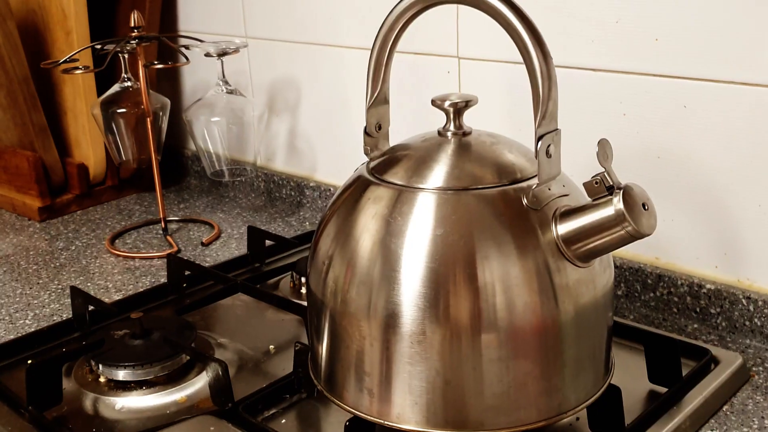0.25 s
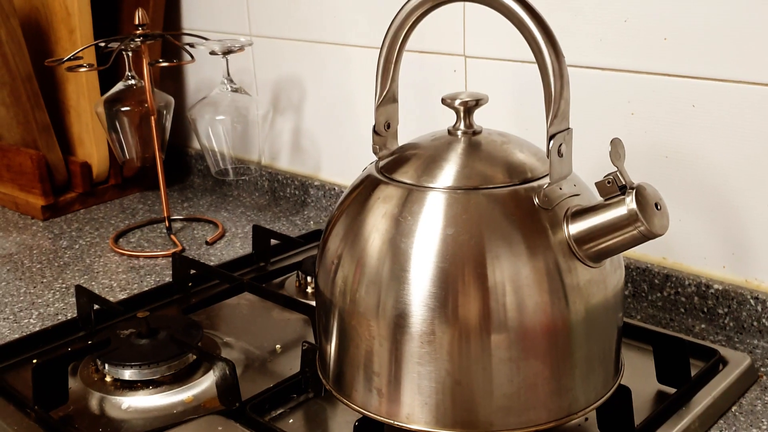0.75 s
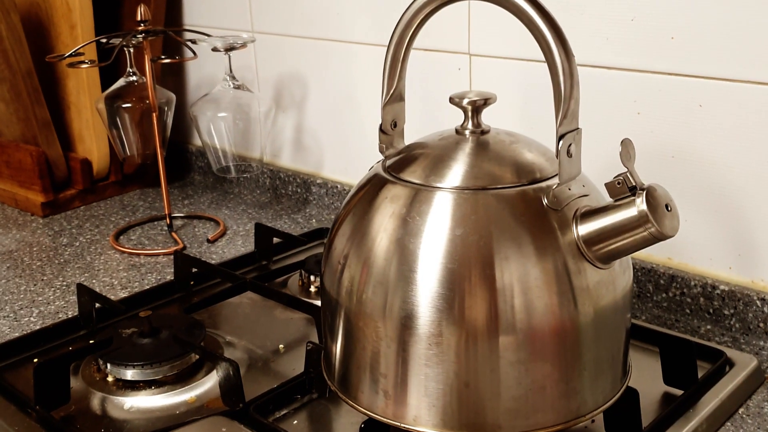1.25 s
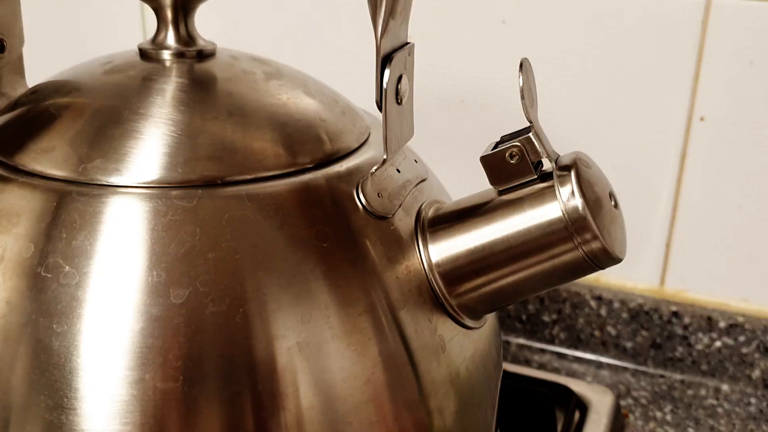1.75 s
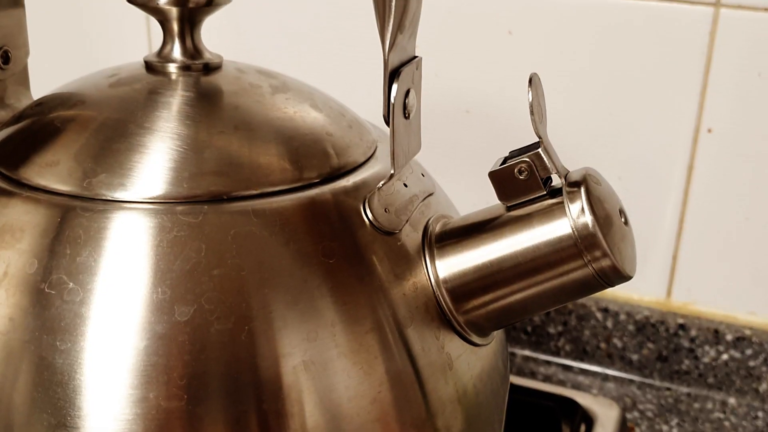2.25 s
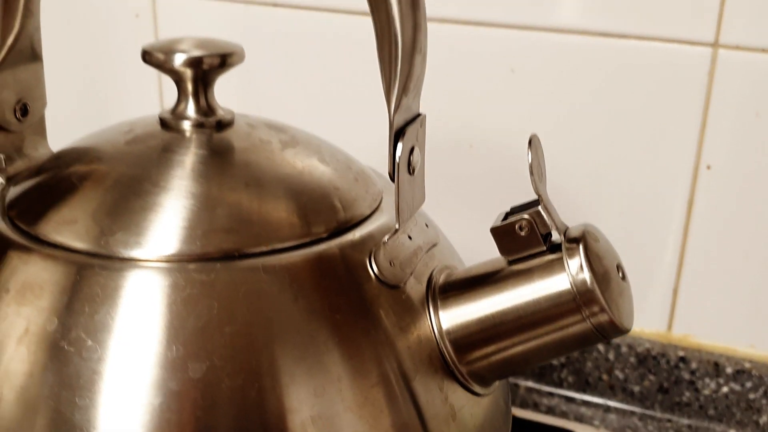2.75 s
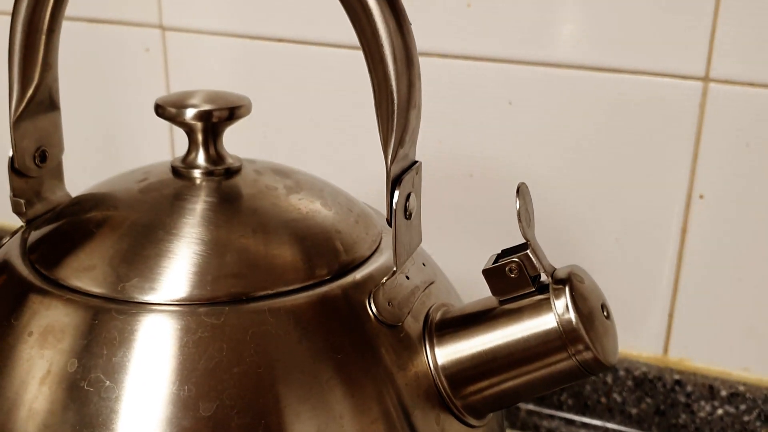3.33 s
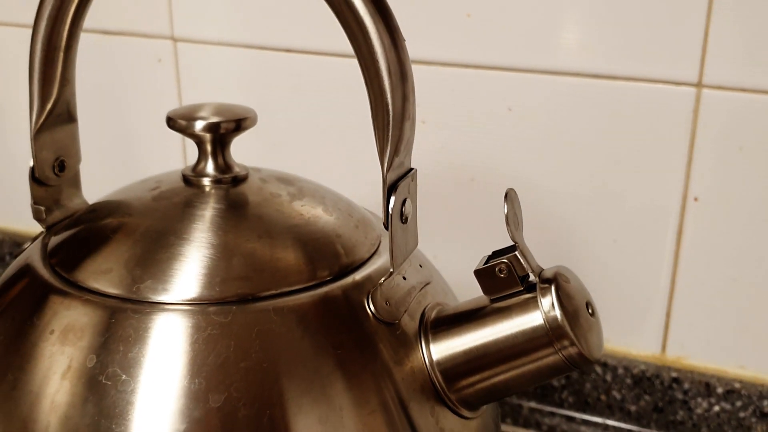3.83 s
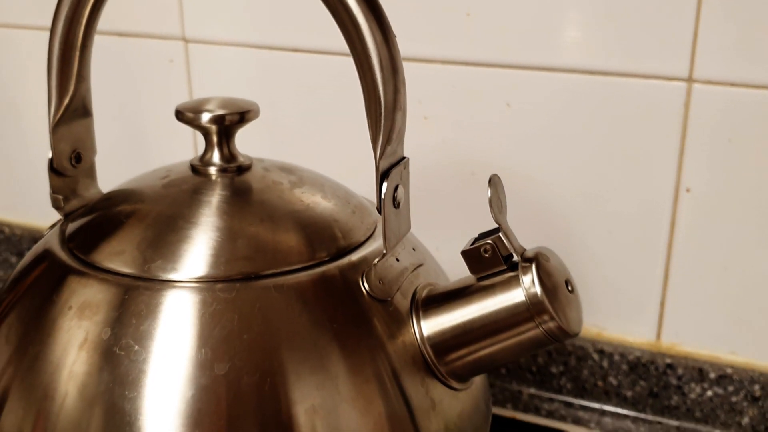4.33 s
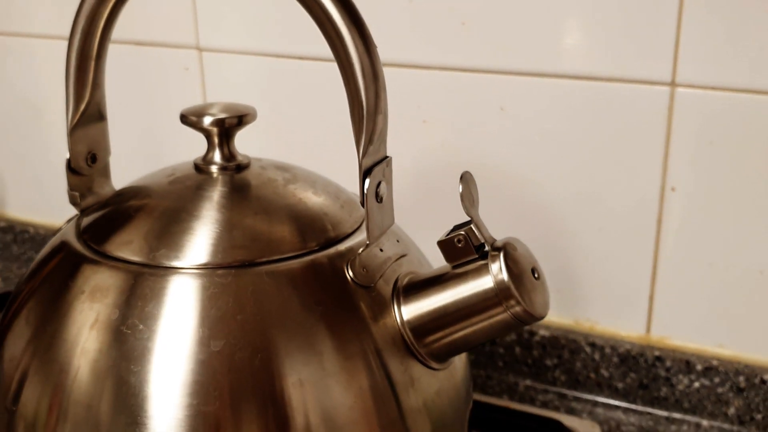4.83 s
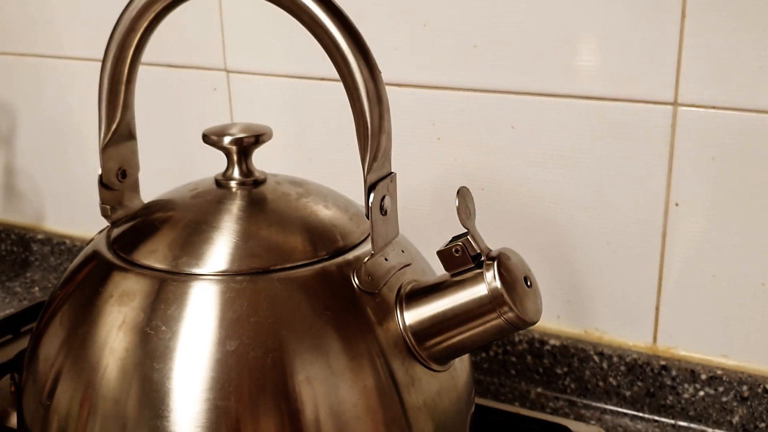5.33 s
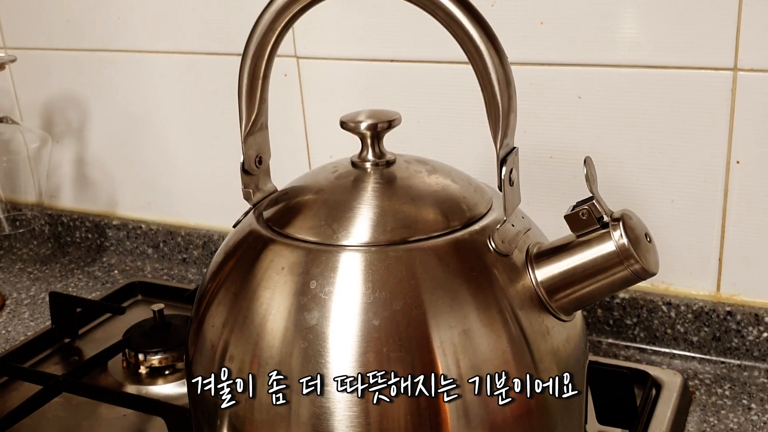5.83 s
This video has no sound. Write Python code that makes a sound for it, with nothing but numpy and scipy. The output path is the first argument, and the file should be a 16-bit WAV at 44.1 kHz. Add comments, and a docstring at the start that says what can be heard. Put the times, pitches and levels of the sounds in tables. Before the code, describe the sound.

In a small tiled kitchen, water seethes for an instant, then after a tiny gap a kettle whistles from a step away in hissing steam. It flips briefly to a higher, purer note and returns. A hard cut brings the microphone close: a louder, brighter whistle wavers and creeps upward over a faint flame rumble. It cuts suddenly to a very quiet low whistle.

```python
"""Whistling kettle

A steel kettle whistles on a gas hob in a tiled kitchen, in four passages: seething, far, near, weak.
Shaped noise makes the seething water. Then steam sings in the spout cap, as pitch-driven sine partials in
a bed of hiss, and briefly jumps to a higher mode. From close by the whistle is louder and creeps up,
wavering with the pressure; last comes a weak, low whistle. Low noise rumbles as the flame under all three
whistles."""
import sys
import numpy as np
from scipy import signal
from scipy.fft import rfft, irfft
from scipy.io import wavfile
from scipy.ndimage import uniform_filter1d, map_coordinates

SR = 44100
rng = np.random.default_rng(int(sys.argv[2]) if len(sys.argv) > 2 else 0)


def master(y):
    """Save y as 16-bit WAV."""
    cut = np.clip(np.atleast_2d(y).T, -1, 1)
    pcm = np.round(cut * 32767)  # scale
    wavfile.write(sys.argv[1], SR, pcm.astype(np.int16))


N = 267995
TIME = np.arange(N) / SR
BINS = np.maximum(np.arange(N // 2 + 1) * SR / N, 1)  # Hz

# passages and the jump to the higher mode: (start s, end s)
SEETHE_SPAN, FAR_SPAN = (0, .137), (.197, 1.806)
NEAR_SPAN, WEAK_SPAN = (1.855, 5.767), (5.767, 6.1)
JUMP = (0.656, 1.008)
KITCHEN_T60_S = 0.35


def whistle(pitch_hz, partials, lower_db, upper_db, waver, jitter, wet_db, lag_s=0):
    """The jet oscillates in the cap: pressure swings bend its pitch and turbulence roughens it."""
    hz = pitch_hz * (1 + waver * drift(36.0) + jitter * drift(169.4))
    # the right ear hears it later by the lag
    phase = 2 * np.pi * (np.cumsum(hz) / SR - lag_s * hz * [[0], [1]])
    # an unsteady jet flutters in strength too
    flutter = from_db(190 * jitter * drift(70))
    out = 0
    for multiple, db, balance_db in partials:
        # higher partials beam forward and excite the room less
        tone = kitchen(flutter * np.sin(round(multiple) * phase), wet_db - 2 * np.log2(multiple))
        # the steam flow alone sets the slow level; quick fades remain
        tone /= np.sqrt(uniform_filter1d(tone ** 2, size=2000, axis=1) + 1e-9)
        level_db = db + (lower_db if multiple < 1.5 else upper_db)
        out = out + tone * panned(balance_db) * from_db(level_db)
    return out


# whistle pitch, which follows the steam pressure: (t/s, f/Hz)
NEAR_PITCH = [(1.86, 2225), (1.94, 2265), (1.99, 2237), (2.08, 2253), (2.23, 2260), (2.29, 2315),
              (2.34, 2272), (2.41, 2317), (2.5, 2286), (2.54, 2258), (2.62, 2248), (2.67, 2265),
              (2.81, 2262), (2.91, 2312), (2.99, 2280), (3.03, 2250), (3.21, 2218), (3.5, 2254),
              (3.55, 2281), (3.64, 2266), (3.72, 2243), (3.85, 2234), (3.9, 2273), (3.97, 2264),
              (4.01, 2217), (4.12, 2279), (4.21, 2213), (4.29, 2257), (4.41, 2247), (4.45, 2223),
              (4.48, 2257), (4.55, 2290), (4.575, 2274), (4.62, 2256), (4.65, 2302), (4.72, 2324),
              (4.762, 2248), (4.797, 2355), (4.828, 2260), (4.85, 2304), (4.9, 2318), (4.925, 2382),
              (4.975, 2298), (5.01, 2290), (5.028, 2350), (5.072, 2343), (5.097, 2274), (5.17, 2293),
              (5.245, 2333), (5.28, 2310), (5.35, 2314), (5.39, 2390), (5.42, 2372), (5.44, 2318),
              (5.48, 2327), (5.515, 2364), (5.565, 2340), (5.615, 2387), (5.66, 2371), (5.76, 2340)]
# partials: (multiple of the pitch, level/dB against its driving curve, left-right/dB)
NEAR_PARTIALS = [(1, 1, -4), (2, 0, -8.5), (3, -10.5, -2), (4, -27, -23), (5, -31.5, -28)]
# steam hiss, peaking at the spout's resonances: (f/Hz, level/dB per Hz)
NEAR_HISS = [(500, -37), (1350, -13), (1650, -18.5), (1950, -4.5), (2400, -1), (2950, -3), (3400, 1),
             (4200, -3), (5200, 1.5), (7600, -3), (9600, -12.5), (13000, -11), (15500, -24)]
# narrow rings and one null of the cap: (f/Hz, width/Hz, level/dB over the hiss)
CAP_RINGS = [(2740, 167, -29), (3870, 52, 6), (4110, 140, 8), (4890, 97, 4.5), (7350, 71, 6)]
# spurts of steam flick the pitch upward: (t/s, height/percent)
FLICKS = [(2.286, 1.22), (2.862, 1.67), (4.651, 2.26), (4.958, 2.5), (5.255, 3.2), (5.732, 2.56)]
REST_HZ, FLICK_HALF_S = 2238.4, 0.00651
# turbulence bends the pitch more as pressure grows: (share of the pitch, share per percent)
CALM_JITTER, JITTER_PER_PERCENT = .003, 0.00056
# a rasp just under the fundamental fades as the tone firms up
RASP_DB, RASP_FADE_DB_PER_S = -13, 2


def near_kettle():
    """At full boil, mostly direct sound in a bright steam jet whose resonances ride with the pitch."""
    pitch_hz, = in_time(NEAR_PITCH)
    pressure = 100 * (pitch_hz / REST_HZ - 1)  # percent of pitch above rest
    first_db, octave_db, hiss_db, treble_db = near_blow(pressure)
    flick_percent = swells([(s, FLICK_HALF_S, percent) for s, percent in FLICKS])
    flicked_hz = pitch_hz * (1 + flick_percent / 100)
    jitter = CALM_JITTER + JITTER_PER_PERCENT * np.maximum(pressure, 0)
    tone = whistle(flicked_hz, NEAR_PARTIALS, first_db, octave_db,
                   waver=0.0043, jitter=jitter, wet_db=-8.0, lag_s=2.8e-5)

    sputter = from_db(2.8 * np.tanh(drift(14)))
    fifth = from_db(-14.5) * sputter * panned(-19.0) * breathy_mode(NEAR_PITCH, 3 / 2, width_hz=21)
    rasp_db = RASP_DB - RASP_FADE_DB_PER_S * (TIME - NEAR_SPAN[0])
    rasp = from_db(rasp_db) * breathy_mode(NEAR_PITCH, 0.9, width_hz=94)

    jet = steam(NEAR_HISS, CAP_RINGS, direct_share=0.83, tuning=pitch_hz / REST_HZ)
    treble = irfft(rfft(jet) / (1 + (9000 / BINS) ** 6), N)
    jet = jet + treble * (from_db(treble_db) - 1)
    return tone + from_db(hiss_db + 6.5 + 1.55 * drift(49)) * (jet + fifth + rasp)


# the close steam jet: (t/s, level/dB before the jet's 6.5 dB lift, treble level/dB)
NEAR_STEAM = [(1.9, -55.5, -6.5), (2.3, -53.5, -2.5), (3.2, -54, -2.3), (3.6, -53.5, 0.5), (4.1, -56, -0.5),
              (4.7, -57, 0.5), (5.7, -58, -1)]
# the jet keeps losing its lock and the tone stutters: (middle t/s, half length/s, loss/dB before its swing)
STUTTERS = [(2.245, 0.02, 6.5), (2.325, 0.023, 4.5), (2.495, 0.029, 7.5), (2.7, 0.037, 12),
            (2.87, 0.041, 7), (2.955, 0.025, 10.5)]
# the loss swings by a share of itself; the octave feels a share of it
STUTTER_SWING, STUTTERS_PER_S, OCTAVE_FEELS = 0.73, 58, 0.21
# at the start of the passage; the fundamental slowly gains on the octave
NEAR_FIRST_DB, NEAR_OCTAVE_DB, FIRST_DB_PER_S = -37.5, -39, 0.58
# pressure feeds and brightens the hiss and starves the octave
HISS_DB_PER_PERCENT, TREBLE_DB_PER_PERCENT, OCTAVE_DB_PER_PERCENT = 0.48, 1.09, -0.4
# a deeper pressure sag makes the flow falter: (percent of pitch, octave loss in dB per further percent)
SAG_PERCENT, SAG_OCTAVE_DB = 0.43, 6.5


def near_blow(pressure):
    """Pressure, its sags and the losses of lock set the fundamental, octave, hiss and treble levels."""
    steam_db, treble_db = in_time(NEAR_STEAM)
    sag = np.maximum(uniform_filter1d(pressure, size=17000) - pressure - SAG_PERCENT, 0)
    stutter_db = swells(STUTTERS) * (1 + STUTTER_SWING * drift(STUTTERS_PER_S))
    first_db = NEAR_FIRST_DB + FIRST_DB_PER_S * (TIME - NEAR_SPAN[0]) - stutter_db
    octave_db = NEAR_OCTAVE_DB + OCTAVE_DB_PER_PERCENT * pressure
    octave_db = octave_db - OCTAVE_FEELS * stutter_db - SAG_OCTAVE_DB * sag
    hiss_db = steam_db + HISS_DB_PER_PERCENT * pressure
    return first_db, octave_db, hiss_db, treble_db + TREBLE_DB_PER_PERCENT * pressure


# whistle pitch, one list before the jump and one after: (t/s, f/Hz)
FAR_PITCH = [
    [(0.25, 2105), (0.37, 2074), (0.42, 2090), (0.562, 2095), (0.65, 2043)],
    [(1.02, 2128), (1.09, 2205), (1.23, 2170), (1.31, 2135), (1.46, 2176), (1.5, 2144), (1.6, 2193),
     (1.66, 2115), (1.79, 2132)],
]
# pitch of the higher mode: (t/s, f/Hz)
JUMP_PITCH = [(.657, 3400), (.68, 3256), (.72, 3309), (.85, 3395), (.95, 3508), (.985, 3380), (1.01, 3630)]
# level driving the higher mode: (t/s, level/dB)
JUMP_LEVEL = [(0.665, -46), (0.724, -44.5), (0.736, -42.5), (0.812, -35.5), (0.828, -40), (0.918, -38),
              (0.948, -48), (0.972, -36.5), (1.0, -39.5)]
# partials of either mode: (multiple of the pitch, level/dB against its driving curve, left-right/dB)
FAR_PARTIALS = [(1, -2, -4.5), (2, -0.5, -9.5), (3, -27.5, -45), (4, -31.5, 18)]
JUMP_PARTIALS = [(1, -0.5, -6.5), (2, -27.5, 2), (3, -43, -3)]
# steam hiss, peaking at the spout's resonances: (f/Hz, level/dB per Hz)
FAR_HISS = [(500, -20), (1450, -8.5), (1980, 8), (2400, 3.5), (2750, -1), (3200, 1.5), (3700, 7.5),
            (4700, 5), (5800, -0.5), (7000, -4.5), (8200, -9.5), (11000, -10.5), (15500, -17)]


def far_kettle():
    """From a step away; for a moment the jet locks on the cap's higher mode and the main tone gives way."""
    pitch = np.vstack(FAR_PITCH)
    first_db, octave_db, hiss_db, jitter = far_blow()
    jump_db, = in_time(JUMP_LEVEL)
    jumped = during(JUMP, edge_s=0.0054)
    main = whistle(in_time(pitch)[0], FAR_PARTIALS, first_db, octave_db,
                   waver=0.00304, jitter=jitter, wet_db=-9.5, lag_s=7e-5)
    high = whistle(in_time(JUMP_PITCH)[0], JUMP_PARTIALS, jump_db, jump_db,
                   waver=0.0034, jitter=0.0034, wet_db=3)
    # after each switch the old tone only dies away in the room
    ring_out = from_db(-jumped * (12 + 60 * (TIME - JUMP[0]) / KITCHEN_T60_S))
    high_decay = np.exp(-np.maximum(TIME - JUMP[1], 0) / 0.037)
    high_gate = during((JUMP[0], FAR_SPAN[1]), edge_s=.004) * high_decay

    fifth = from_db(-4.5) * breathy_mode(pitch, 1.51, width_hz=53)
    # while unlocked, the lower mode is rung by turbulence alone
    rasp = from_db(-6.5 + 10.2 * jumped) * breathy_mode(pitch, 0.95, width_hz=120)
    hiss_gain = from_db(hiss_db + hush() + 10.0 + 1.65 * drift(30))
    hiss = hiss_gain * (steam(FAR_HISS, [], direct_share=0.35) + fifth + rasp)
    return main * ring_out + high * high_gate + hiss


# before and after the jump: (fundamental level/dB, octave level/dB, hiss level/dB before its 10 dB lift,
# jitter as a share of the pitch)
FAR_BLOW = [(-39, -41, -61.5, 0.0036), (-41.5, -39, -60, 0.0052)]
# the fundamental is slow to return, and fades at the end: (middle t/s, half length/s, loss/dB)
FAR_FADES = [(1.01, 0.033, 6), (1.75, 0.041, 14)]
FAR_SWELL_DB, FAR_SWELLS_PER_S = 2, 28


def far_blow():
    """Each side of the jump holds its levels and jitter; the fundamental swells and sags at random."""
    after_jump = (TIME > np.mean(JUMP)).astype(int)
    first_db, octave_db, hiss_db, jitter = np.array(FAR_BLOW)[after_jump].T
    first_db = first_db + FAR_SWELL_DB * drift(FAR_SWELLS_PER_S) - swells(FAR_FADES)
    return first_db, octave_db, hiss_db, jitter


HUSH_DB, HUSH_FALL_S, HUSH_RECOVER_S = 18, 0.088, 0.27


def hush():
    """While the higher mode takes the flow, the hiss sinks quickly and then creeps back (dB)."""
    since = TIME - JUMP[0]
    recovery = np.exp(-np.maximum(since - HUSH_FALL_S, 0) / HUSH_RECOVER_S)
    depth = np.clip(since / HUSH_FALL_S, 0, 1) * recovery
    return -HUSH_DB * depth * during(JUMP, edge_s=0.012)


# low whistle pitch: (t/s, f/Hz)
WEAK_PITCH = [(5.77, 980), (5.785, 997.5), (5.85, 1004), (5.93, 983), (5.964, 925), (5.98, 1015),
              (6.07, 1030)]
# levels driving the partials: (t/s, fundamental level/dB, octave level/dB)
WEAK_LEVEL = [(5.785, -62, -53.5), (5.91, -61, -57.5), (5.955, -71, -50), (5.99, -59.5, -58.5),
              (6.07, -60, -60.5)]
# partials: (multiple of the pitch, level/dB against its driving curve, left-right/dB)
WEAK_PARTIALS = [(1, 1.5, -1), (2, 5.5, 0.5), (3, -14, -11), (4, -19, -7), (5, -31, 12)]


def weak_kettle():
    """With little steam the cap sounds about an octave lower and barely hisses."""
    first_db, octave_db = in_time(WEAK_LEVEL)
    tone = whistle(in_time(WEAK_PITCH)[0], WEAK_PARTIALS, first_db, octave_db,
                   waver=0.00181, jitter=0.0036, wet_db=3)
    hiss = noise(NEAR_HISS, [], alike_below_hz=1000)
    return tone + from_db(-79.0 + 1.45 * drift(24)) * hiss


# stereo lean of the hiss: (f/Hz, left-right/dB)
HISS_BALANCE = [(1000, 0.5), (2000, -5.5), (2800, -2), (4000, -6), (5500, 0), (8400, 3.5), (9200, -2.5),
                (11000, -4), (15500, 5.5)]


def steam(spectrum, rings, direct_share, tuning=1):
    """One jet off nearby surfaces, blended with its diffuse sound; tuning scales its resonances."""
    balance_db = per_bin(HISS_BALANCE)
    position = np.cumsum(tuning * np.ones(N)) % N

    def jet(alike_below_hz):
        """The hiss, read faster or slower as the tuning moves."""
        sides = noise(spectrum, rings, alike_below_hz, balance_db)
        return np.array([map_coordinates(side, [position], order=5, mode="mirror") for side in sides])

    direct = surfaces(jet(alike_below_hz=6400))
    diffuse = jet(alike_below_hz=89)
    return np.sqrt(direct_share) * direct + np.sqrt(1 - direct_share) * diffuse


# reflections off kettle body, handle and wall: (left delay t/s, right delay t/s, level/dB)
NEAR_ECHOES = [(.00086, 0.00081, -13), (.00161, .00141, -12.5), (.00286, .0033, -22), (.0071, .0062, -2.5)]


def surfaces(x):
    """Hard surfaces close by send the hiss back, and comb its colour differently for each side."""
    paths = 1
    for left_s, right_s, db in NEAR_ECHOES:
        paths = paths + from_db(db) * np.exp(-2j * np.pi * BINS * [[left_s], [right_s]])
    return rms_one(irfft(rfft(x) * paths, N))


def breathy_mode(pitch, multiple, width_hz):
    """A spout mode that does not lock into a tone: turbulence rings it, and it moves with the pitch."""
    phase = 2 * np.pi * np.cumsum(multiple * in_time(pitch)[0]) / SR
    band = drift(width_hz) * np.sin(phase) + drift(width_hz) * np.cos(phase)
    return rms_one(kitchen(band, wet_db=21.5))


# soft gurgles in the water: (t/s, level/dB)
GURGLES = [(0.336, -58), (.47, -59.5)]


def gurgles():
    """Steam bursts through the water in short puffs that ring the kettle body."""
    puffs = sum(from_db(db) * (TIME > s) * np.exp(-np.abs(TIME - s) / 0.054) for s, db in GURGLES)
    # rings: (f/Hz, width/Hz, level/dB)
    return puffs * noise(SEETHE, [(815, 86, 11), (1087, 140, 9.3)], alike_below_hz=130)


# seething water: (f/Hz, level/dB per Hz)
SEETHE = [(24, -44), (40, -6), (177, -26), (263, -9), (338, -17), (514, -4), (1320, -11), (1490, -7.5),
          (3140, -23.5), (3740, -19.5), (15000, -48.5)]
# rings of the kettle body: (f/Hz, width/Hz, level/dB over the noise)
BODY_RINGS = [(570, 27, 3.6), (1410, 38, 7.6)]


def seething():
    """Seething water is a steady noise coloured by the rings of the kettle body, at unit power."""
    return noise(SEETHE, BODY_RINGS, alike_below_hz=400)


# gas flame: (f/Hz, level/dB per Hz)
FLAME = [(25, -14), (55, -1), (135, 2.5), (190, -6), (400, -9.5), (700, -6.5), (1500, -15), (4000, -20),
         (15000, -59)]
# ring of the hob: (f/Hz, width/Hz, level/dB over the noise)
HOB_RINGS = [(338.3, 15, 10.5)]


def gas_flame():
    """The burning gas rumbles as a steady low noise and rings the hob."""
    return from_db(-69.5) * panned(-0.99) * noise(FLAME, HOB_RINGS, alike_below_hz=540)


def kitchen(x, wet_db):
    """Dense reflections off tiles and hob join the direct sound; a wavering tone fades among them."""
    t = TIME[:SR // 2]
    near_walls = from_db(2.0) * np.exp(-t / 0.054)
    decay = from_db(-60 * t / KITCHEN_T60_S) + near_walls
    echoes = rng.standard_normal((2, len(t))) * decay * (t > .001)
    echoes /= np.sqrt(np.sum(echoes ** 2, axis=1, keepdims=True))
    return x + from_db(wet_db) * signal.fftconvolve(np.atleast_2d(x), echoes, axes=1)[:, :N]


def noise(spectrum, rings, alike_below_hz, balance_db=0):
    """Coloured stereo noise with resonances; the sides agree in the bass and part in the treble."""
    gain = from_db(per_bin(spectrum))
    for hz, width, db in rings:
        gain = gain * from_db(db / (1 + (2 * (BINS - hz) / width) ** 2))
    alike = 1 / (1 + BINS / alike_below_hz)
    mid, side = rfft(rng.standard_normal((2, N)))
    both = np.sqrt(1 + alike) * mid + np.sqrt(1 - alike) * side * [[1], [-1]]
    return rms_one(irfft(both * gain * panned(balance_db), N))


def drift(rate):
    """Random drift of unit power, falling off above the given rate in Hz."""
    return rms_one(irfft(rfft(rng.standard_normal(N)) / (1 + (BINS / rate) ** 2), N))


def swells(rows):
    """Bell-shaped swells from rows of (middle s, half length s, height)."""
    return sum(height * np.exp(-((TIME - s) / half_s) ** 2) for s, half_s, height in rows)


def during(span, edge_s=0.00019):
    """1 inside the span, 0 outside, with short ramps."""
    return np.clip(np.minimum(TIME - span[0], span[1] - TIME) / edge_s + .5, 0, 1)


def in_time(rows):
    """Each column of a curve, at every sample."""
    s, *columns = np.transpose(rows)
    return [np.interp(TIME, s, c) for c in columns]


def per_bin(points):
    """A spectrum joined by straight lines on a log-frequency axis."""
    hz, value = np.transpose(points)
    return np.interp(np.log(BINS), np.log(hz), value)


def panned(balance_db):
    """Left and right gains whose mean is 1."""
    gains = from_db(np.array([[.5], [-.5]]) * balance_db)
    return gains / gains.mean(axis=0)


def from_db(db):
    """Decibels to gain."""
    return 10 ** (np.asarray(db) / 20)


def rms_one(x):
    """Scale to unit power."""
    return x / np.sqrt(np.mean(x ** 2) + 1e-20)


def scene():
    """The passages follow each other with hard cuts, two of them across a short silence."""
    seethe = seething()
    flame = gas_flame()
    return (during(SEETHE_SPAN) * from_db(-50.0) * seethe
            + during(FAR_SPAN) * (far_kettle() + gurgles() + flame)
            + during(NEAR_SPAN) * (near_kettle() + flame)
            + during(WEAK_SPAN) * (weak_kettle() + from_db(-72.0) * seethe + flame))


def record(dry):
    """A steep low-pass cuts the top above 15.8 kHz."""
    low_pass = signal.ellip(10, .1, 80, 15800, fs=SR, output="sos")
    return signal.sosfilt(low_pass, dry)


dry = scene()
out = record(dry)
master(out)
```